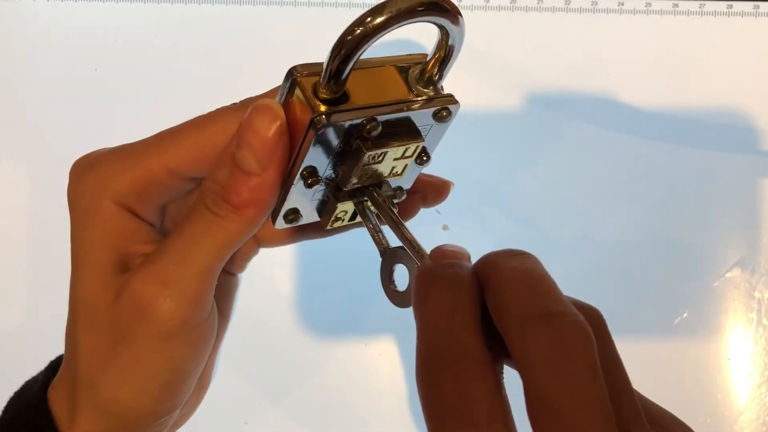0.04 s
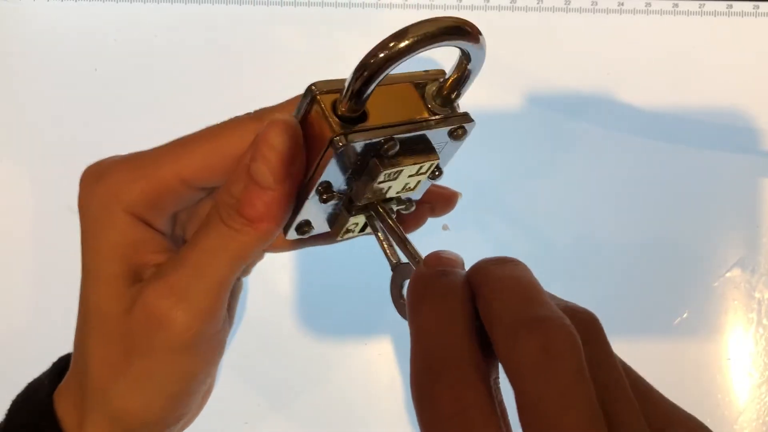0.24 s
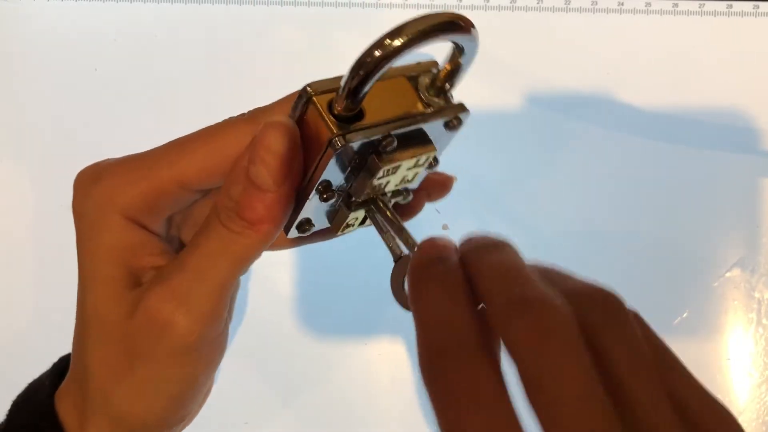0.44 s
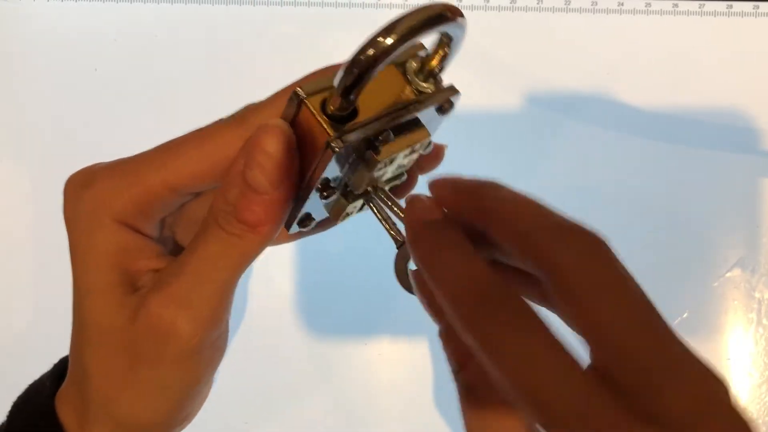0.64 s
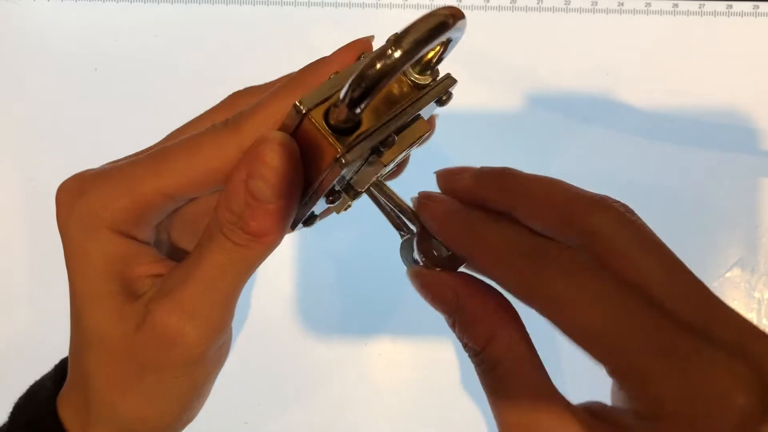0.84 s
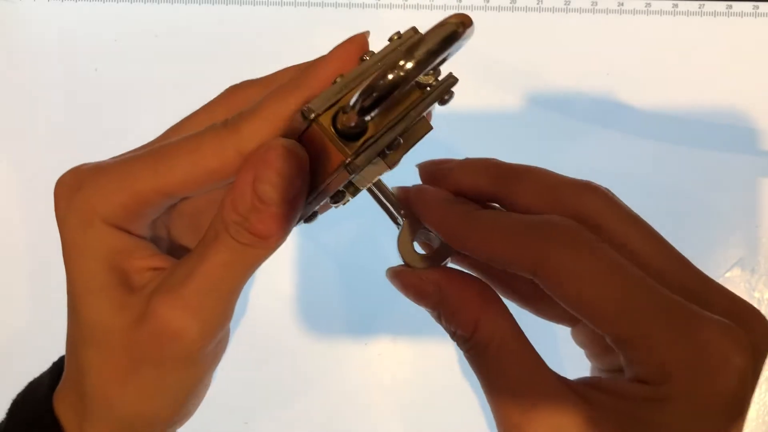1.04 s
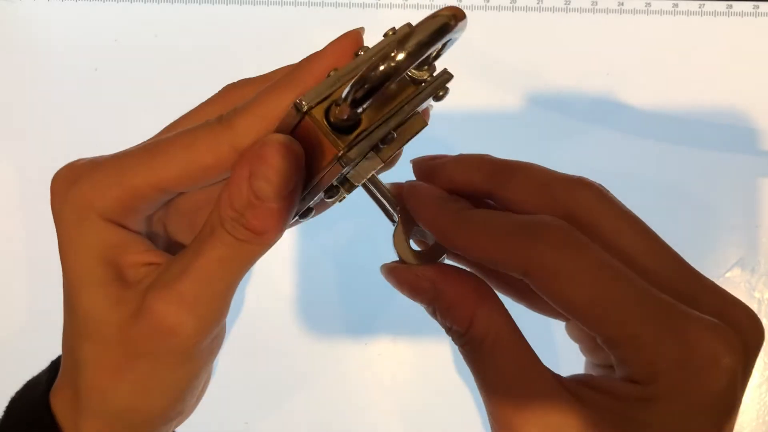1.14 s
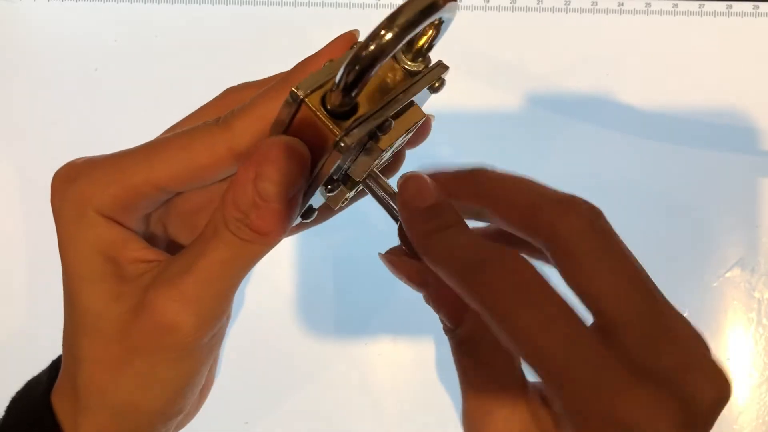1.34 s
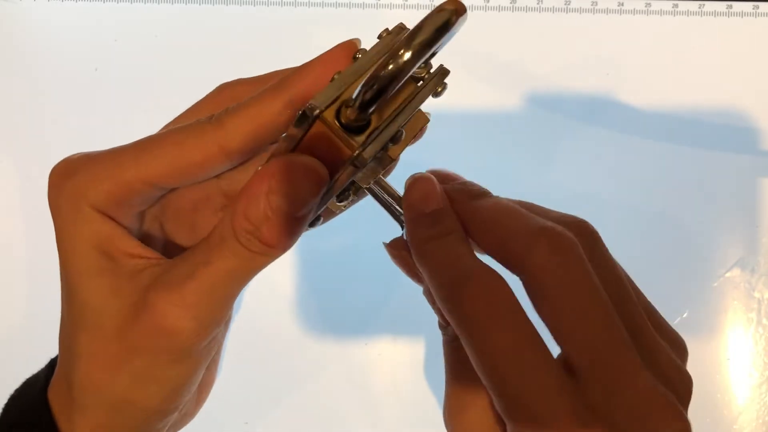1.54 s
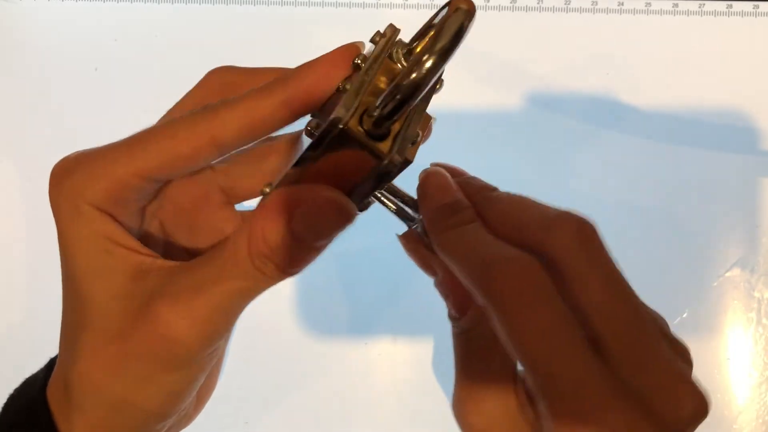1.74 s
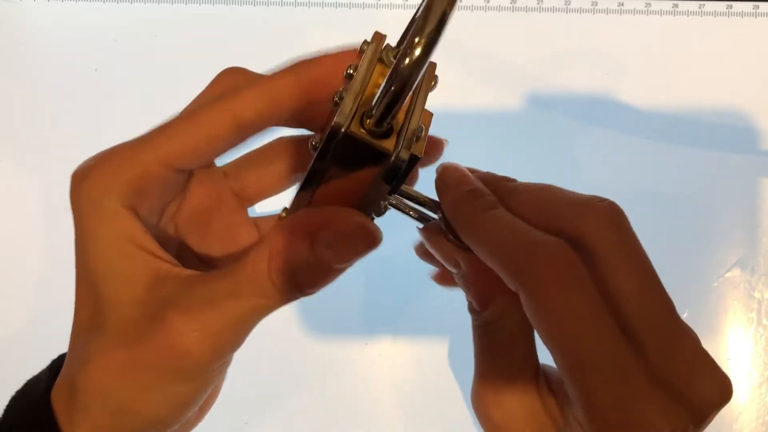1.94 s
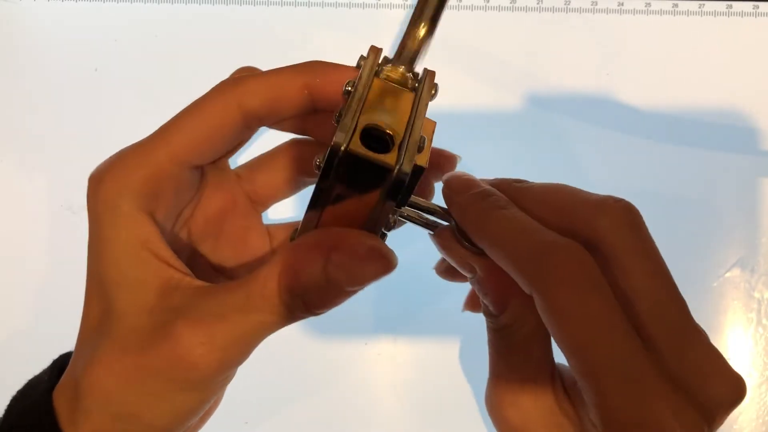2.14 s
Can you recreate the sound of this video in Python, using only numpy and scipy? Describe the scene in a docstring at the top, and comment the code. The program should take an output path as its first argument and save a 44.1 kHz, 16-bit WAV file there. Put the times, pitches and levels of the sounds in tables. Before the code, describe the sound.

A key and loose parts click lightly against a hand-held metal padlock, close by.

```python
"""Padlock puzzle in the hands

Two hands turn a metal padlock puzzle and work a key in it, close by, in a quiet room.
Key and loose parts knock against the lock: bright clicks that the fingers damp at once, and one
short scrape. A faint room tail follows each, over a bed of soft hiss, low hum and a thin whine."""
import sys
import numpy as np
from scipy import signal
from scipy.fft import rfft, irfft
from scipy.io import wavfile

SR = 44100
rng = np.random.default_rng(int(sys.argv[2]) if len(sys.argv) > 2 else 0)


def master(y):
    """Save y as 16-bit WAV."""
    cut = np.clip(np.atleast_2d(y).T, -1, 1)
    pcm = np.round(cut * 32767)  # scale
    wavfile.write(sys.argv[1], SR, pcm.astype(np.int16))


N = 97020
T = np.arange(N) / SR
HIT_T = T[:SR // 10]   # time axis of one hit
FREQS = np.maximum(np.fft.rfftfreq(N, 1 / SR), 1)


def from_db(db):
    """Decibels to gain."""
    return 10 ** (np.asarray(db) / 20)


def at_hz(points, hz):
    """Read a curve on a log-frequency axis."""
    freqs, values = np.transpose(points)
    return np.interp(np.log(hz), np.log(freqs), values)


def unit(x):
    """Scale to an energy of one."""
    return x / np.sqrt(np.sum(x ** 2) + 1e-30)


def fade(t, t60):
    """Exponential decay, 60 dB down after t60 seconds."""
    return np.exp(-np.log(1000) * t / t60)


def noise(gain):
    """Steady noise of rms one, shaped by a gain per frequency."""
    return unit(irfft(gain * np.exp(2j * np.pi * rng.random(len(gain))), N)) * np.sqrt(N)


def minimum_phase(gain):
    """An EQ response with this gain per frequency that never rings ahead of the attack."""
    cepstrum = irfft(np.log(gain))
    half = len(cepstrum) // 2
    return np.exp(rfft(cepstrum * np.r_[1, np.full(half - 1, 2), 1, np.zeros(half - 1)]))


# The EQ of the room tone. Each row: frequency in Hz, relative level in dB.
HISS_EQ = [(24, -33), (36, -24), (55, -5), (100, -3), (170, -1.5), (260, -6.5), (400, -7), (650, -12),
           (1200, -14), (2000, -10.5), (2900, -15), (4000, -19), (6000, -24.5), (9000, -31), (11000, -32.5),
           (12700, -30.5), (14500, -35.5), (16000, -51.5)]
def hiss():
    """Soft, steady room tone, heaviest in the lows."""
    return from_db(-67.5) * noise(from_db(at_hz(HISS_EQ, FREQS)))


# Narrow bands in the room tone. Each row: centre in Hz, width in Hz, level in dB.
HUM_BANDS = [(52.4, 5, -76), (197.94, 2.8, -80.5), (821.7, 11, -87), (2930, 75, -91), (12600, 205, -99)]
def hums():
    """Bell-shaped bands of noise: hum down low, threads of hiss up high."""
    return sum(from_db(db) * noise(np.exp(-((FREQS - centre) / width) ** 2 / 2))
               for centre, width, db in HUM_BANDS)


# The fader ride of the whine. Each row: time in seconds, rms level in dB.
WHINE_RIDE = [(0, -85), (.4, -82), (.9, -80.5), (1.35, -78), (1.7, -83.5), (2.2, -80)]
def whine(centre_hz=2918, waver_depth_hz=5, waver_rate_hz=8):
    """A thin tone whose pitch wavers slightly at random."""
    pitch = centre_hz + waver_depth_hz * noise(1 / (1 + (FREQS / waver_rate_hz) ** 2))
    level = from_db(np.interp(T, *np.transpose(WHINE_RIDE)))
    return np.sqrt(2) * level * np.sin(2 * np.pi * np.cumsum(pitch) / SR)


# The EQ of the clack. Each row: frequency in Hz, relative level in dB.
CLACK_EQ = [(300, -38), (700, -27), (1200, -20), (2000, -16.5), (3000, -7), (4000, 1.5), (5000, 4),
            (6300, -2), (7700, -7), (10000, -6), (12500, -17.5), (15500, -10.5)]
def clack(low_db, treble_db, low_shelf_hz=3020, treble_shelf_hz=7280, t60=0.021):
    """Crowded metal modes that die within milliseconds, darker or brighter with the contact."""
    tick = 1 + from_db(1.5) * np.exp(-HIT_T / 0.00085)   # the first instant of contact stands out
    spectrum = rfft(rng.standard_normal(len(HIT_T)) * fade(HIT_T, t60) * tick)
    evened = spectrum / np.abs(spectrum) ** 0.75   # the modes share the energy fairly evenly
    burst = irfft(evened) * np.exp(-(HIT_T / t60) ** 2)
    hz = np.maximum(np.fft.rfftfreq(len(HIT_T), 1 / SR), 1)
    shelves_db = low_db / (1 + (hz / low_shelf_hz) ** 6) + treble_db / (1 + (treble_shelf_hz / hz) ** 6)
    eq = minimum_phase(from_db(at_hz(CLACK_EQ, hz) + shelves_db))
    return unit(irfft(rfft(burst) * eq))


def ring(hz, t60, attack_s=0.0002):
    """One struck mode: a fast-dying sine of unit energy."""
    tone = np.cos(2 * np.pi * (hz * HIT_T + rng.random()))
    return unit(tone * fade(HIT_T, t60) * (1 - np.exp(-HIT_T / attack_s)))


# The modes of the lock body. Each row: pitch in Hz, relative level in dB, t60 in seconds.
BODY_MODES = [(1480, -23, 0.0091), (1960, -14, .02), (2653, -16.5, 0.016), (2825, -9.5, .02),
              (3783, -11.5, .03), (4480, -10.5, .035), (4820, -5.5, 0.025), (5090, -11.5, 0.0224),
              (5333, -0.5, .026), (5700, -8, 0.046), (6320, -10, 0.041), (7090, -12, 0.09),
              (8430, -20.5, 0.037), (11780, -13, 0.0496), (15730, -15.5, .027)]
def lock_body():
    """A knock sets all the modes of the hand-damped lock ringing at once."""
    return sum(from_db(db) * ring(hz, t60) for hz, db, t60 in BODY_MODES)


# The cue list of metal contacts. Each row: start in seconds, level in dB, the clack's low shelf in dB
# and treble shelf in dB, lock body in dB, the small part's ring in Hz, its level in dB, its t60 in
# seconds, its overtone in Hz, overtone level in dB. Body, ring and overtone are set against the clack.
CONTACTS = [ (0.0525, -45.5, 10, 5, -9, 5850, -5, 0.019, 14900, -8),
            (0.0542, -43, -5, 2.5, -35, 5930, -0.5, 0.02, 14800, -6),
            (0.1923, -56, 5, 0, -10, 4800, 6, .015, 13400, -17),
            (0.2015, -31.5, 1.5, 5, -11.5, 4610, 2.5, 0.02, 13500, -11),
            (0.2091, -42, 0, 3, -16, 4590, -12, .016, 9900, -10),
            (0.277, -54, 15.5, -6, -5, 4220, -7, .012, 13500, -15),
            (.3998, -35.5, 1, -1.5, -24, 5560, 0.5, .008, 14130, -8),
            (0.4008, -40.5, -10, 0, -17.5, 5930, -1, 0.017, 11800, 1),
            (.4110, -49.5, 22.5, 12, -13.5, 5560, -23, 0.0097, 11750, -9),
            (0.548, -44, -6, -1, -9, 5230, 3, .012, 12900, -16),
            (.5540, -42.5, -18, -2, -12.5, 5800, -2.5, .012, 8930, -11),
            (0.563, -51, -6, -1, -7, 5240, -12, .012, 12800, -16),
            (0.6048, -22.5, 5, 1.5, -1, 4870, -2, .012, 11900, -10.5),
            (0.6072, -27, 5, -1, -6, 4990, -10, .02, 10700, -7),
            (0.6833, -49, -6, 1, -5, 4820, -5, .014, 11800, -12),
            (.7450, -50.5, -3, -10, -14, 3860, 1, 0.031, 12800, -20),
            (0.799, -56.5, 6, -4, -12, 4600, -3, .014, 10550, -5),
            (0.9059, -54.5, 14, 4, -3, 4980, -6, .012, 10300, -6),
            (0.9277, -40.5, -7, 1, -14, 5830, 5, 0.018, 12000, 0),
            (0.929, -37.5, -10, 2, -24, 5930, 8, 0.024, 9960, -1.5),
            (0.9347, -42, -9, 7, -15, 4620, -11, .016, 12800, -8),
            (0.951, -50.5, -14, -5, 14, 4600, 4, 0.011, 11900, -15),
            (0.9573, -29.5, -4.5, 1.5, -12, 4530, -5.5, 0.0044, 11900, -3.5),
            (0.9579, -33.5, 2, -3, -14.5, 6480, 0.5, 0.024, 13000, -1),
            (0.997, -45.5, 15, 6, -8, 5500, -4.5, 0.014, 10760, -12),
            (1.01, -56, 0, -8, -15, 5400, -3, .012, 10700, -15),
            (1.7182, -45, 9, 3.5, -14, 5940, -1.5, .011, 8840, -13),
            (1.7271, -56, -3, -7, -19, 5900, -2, .011, 8800, -20),
            (1.7963, -54.5, -2.5, -5, -10, 5930, -2, .011, 10400, -15),
            (1.8079, -55, 5, -10, -9, 5860, -2, .011, 8900, -7.5), ]
def clicks(ring_trim_db):
    """Each contact clacks, rings the lock body and rings the small part that struck it."""
    out = np.zeros(N + len(HIT_T))
    for start_s, db, low_db, treble_db, body_db, part_hz, part_db, t60, over_hz, over_db in CONTACTS:
        body = from_db(body_db) * lock_body()
        part = from_db(part_db) * ring(part_hz, t60)
        overtone = from_db(over_db) * ring(over_hz, 0.66 * t60)
        hit = unit(clack(low_db, treble_db) + from_db(ring_trim_db) * (body + part + overtone))
        gain = from_db(db) * np.sqrt(0.002 * SR)   # level as if the whole hit fell within 2 ms
        start = int(start_s * SR)
        out[start:start + len(hit)] += gain * hit
    return out[:N]


# The decay of the room. Each row: frequency in Hz, t60 in seconds.
TAIL_DECAY = [(1000, 0.25), (5000, .36), (9000, .29), (15000, 0.28)]
# The EQ of the tail. Each row: frequency in Hz, relative level in dB.
TAIL_EQ = [(1000, 0), (3000, -5.5), (5000, -1.5), (9000, -1), (15000, -3.5)]
def room_tail(send, wet_db=-18.5, build_s=0.013):
    """A short, diffuse tail that builds as the walls answer and hangs longest around 5 kHz."""
    t, tail = T[:SR // 2], 0
    edges_hz = np.linspace(np.sqrt(700), np.sqrt(17000), 20) ** 2
    for low, high in zip(edges_hz, edges_hz[1:]):
        hz = np.sqrt(low * high)
        band_pass = signal.butter(2, [low, high], "band", fs=SR, output="sos")
        band = signal.sosfilt(band_pass, rng.standard_normal(len(t)))
        tail += from_db(at_hz(TAIL_EQ, hz)) * band * fade(t, at_hz(TAIL_DECAY, hz))
    tail = unit(tail * (1 - np.exp(-(t / build_s) ** 2)))
    return from_db(wet_db) * signal.fftconvolve(send, tail)[:N]


def low_swell(peak_s=0.665, width_s=0.035, hz=53):
    """One faint bass swell just after the hardest knock."""
    level = from_db(-69.5) * np.exp(-((T - peak_s) / width_s) ** 2 / 2)
    return np.sqrt(2) * level * np.sin(2 * np.pi * hz * T)


def key_scrape(start_s=0.921, end_s=0.9295, rise_db=16.5):
    """The key slides along the metal, harder and harder, until it catches."""
    progress = np.clip((T - start_s) / (end_s - start_s), 0, 1)
    sliding = (progress > 0) & (progress < 1)
    friction = rng.standard_normal(N) * sliding * from_db(-42.5 + rise_db * (progress - 1))
    metal = unit(clack(low_db=3, treble_db=3) + from_db(-8) * ring(hz=5600, t60=0.021))
    return signal.fftconvolve(friction, metal)[:N]


def scene():
    """The puzzle up close, its tail from the walls and the room tone beneath, in mono."""
    low_cut = signal.butter(2, 747, "high", fs=SR, output="sos")   # small parts radiate little bass
    direct = signal.sosfilt(low_cut, clicks(ring_trim_db=0) + key_scrape())
    send = signal.sosfilt(low_cut, clicks(ring_trim_db=-3) + key_scrape())   # the walls get less ring
    return (direct + room_tail(send) + hiss() + hums() + whine() + low_swell())[None]


def record(dry):
    """A steep high cut takes off the very top."""
    high_cut = signal.ellip(10, 0.1, 80, 15950, fs=SR, output="sos")
    return signal.sosfilt(high_cut, dry)


dry = scene()
out = record(dry)
master(out)
```